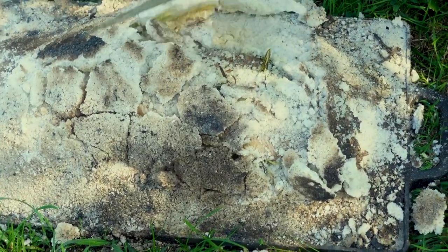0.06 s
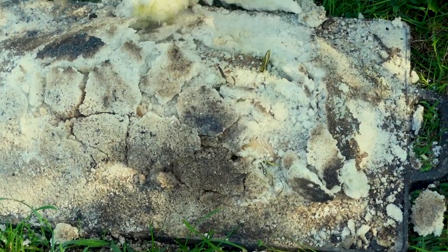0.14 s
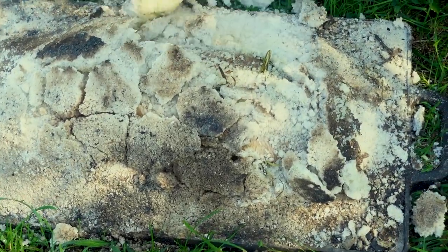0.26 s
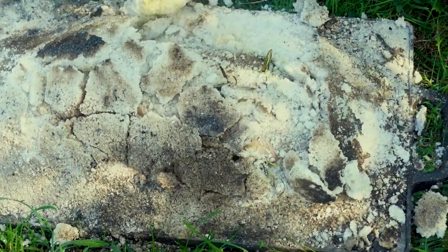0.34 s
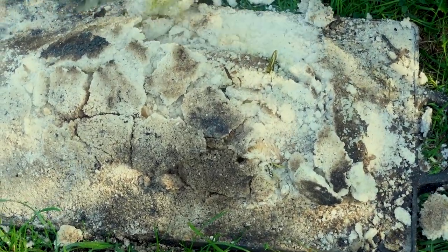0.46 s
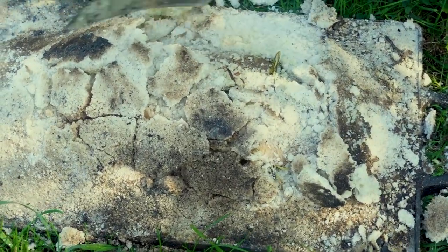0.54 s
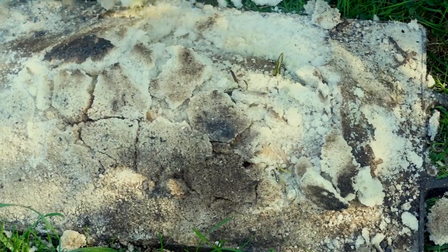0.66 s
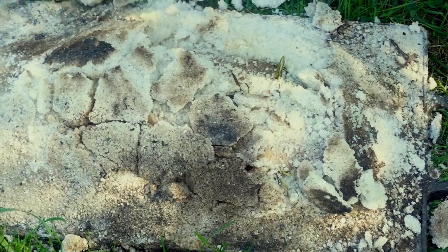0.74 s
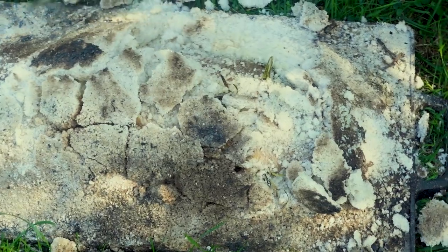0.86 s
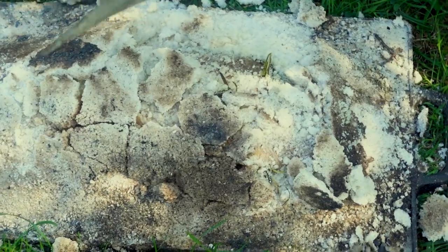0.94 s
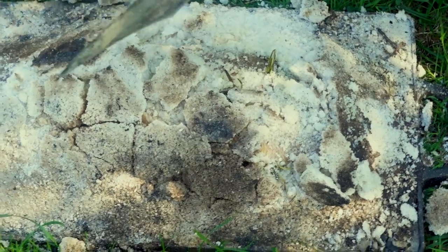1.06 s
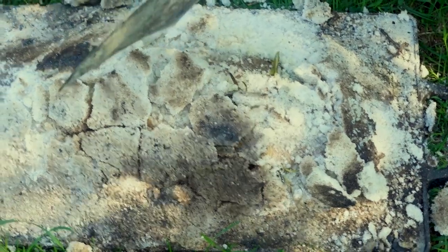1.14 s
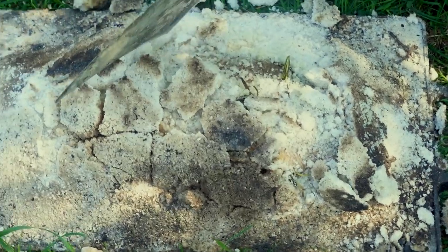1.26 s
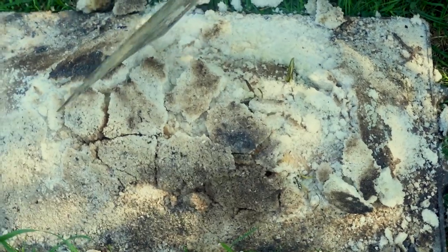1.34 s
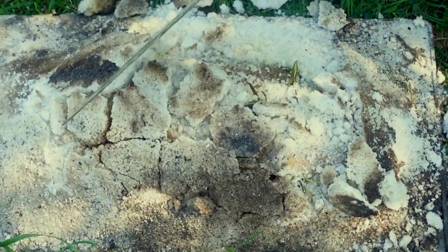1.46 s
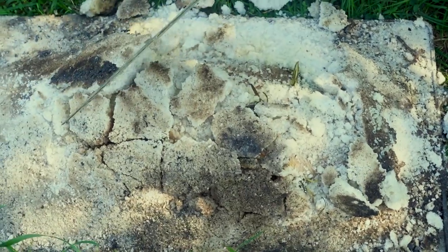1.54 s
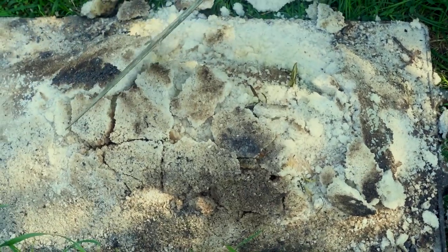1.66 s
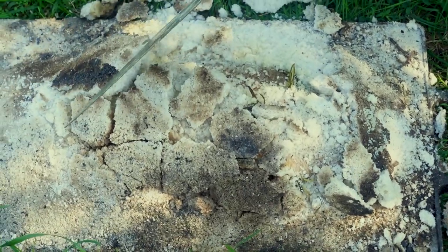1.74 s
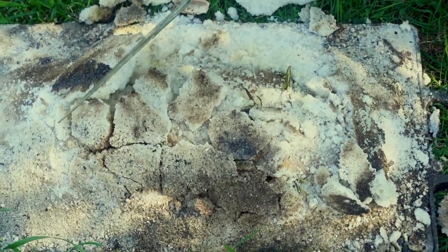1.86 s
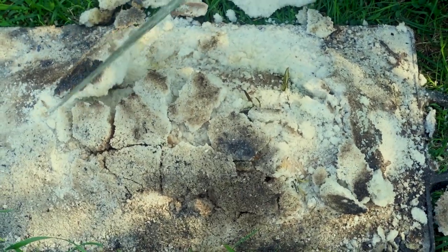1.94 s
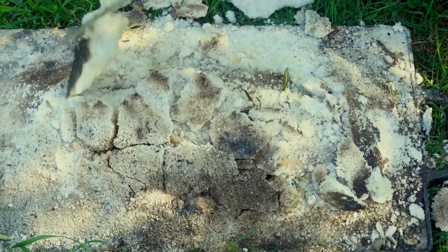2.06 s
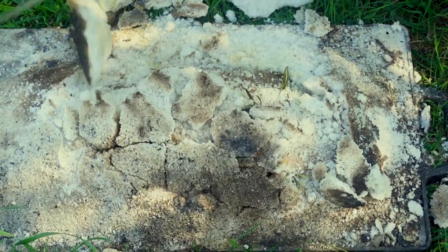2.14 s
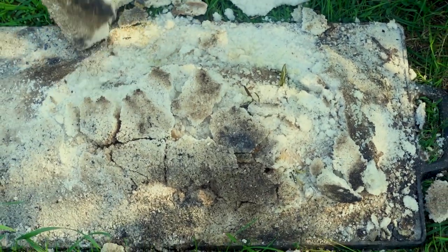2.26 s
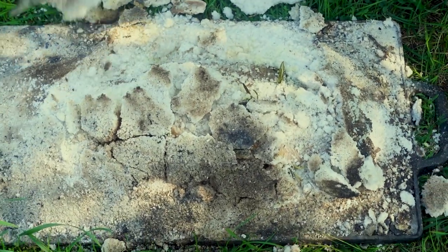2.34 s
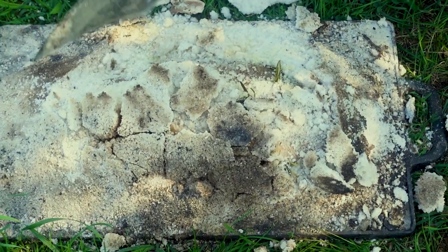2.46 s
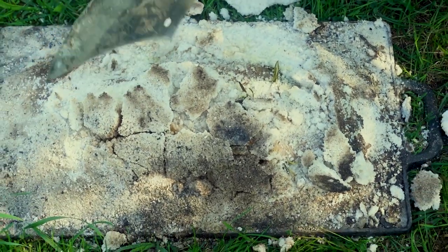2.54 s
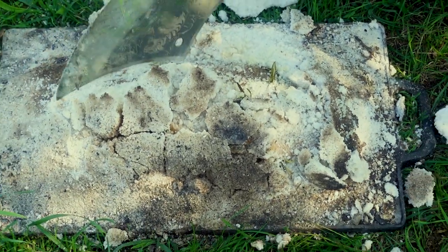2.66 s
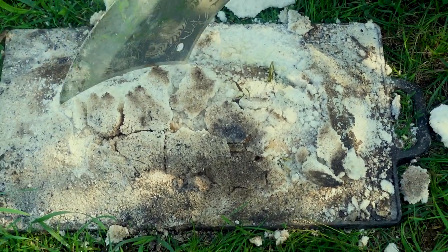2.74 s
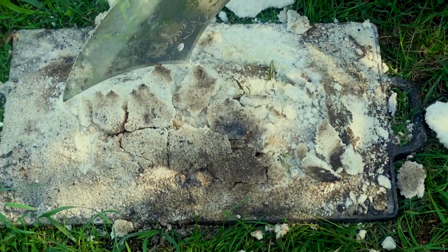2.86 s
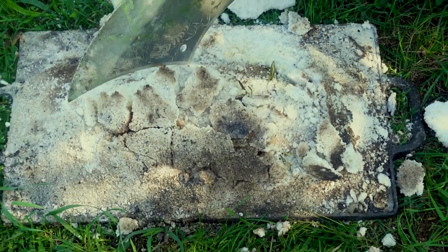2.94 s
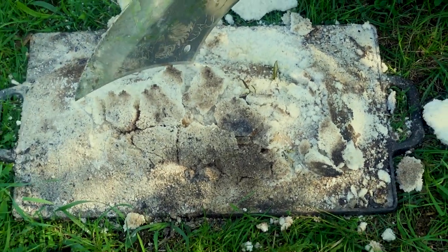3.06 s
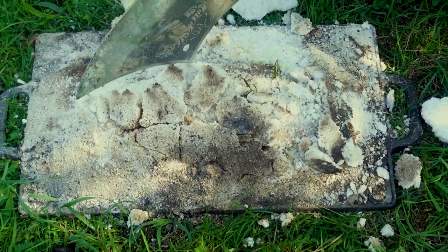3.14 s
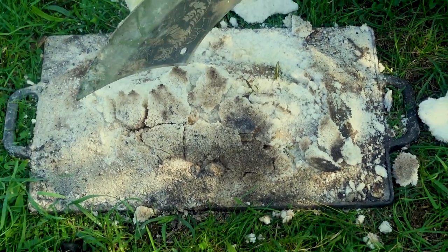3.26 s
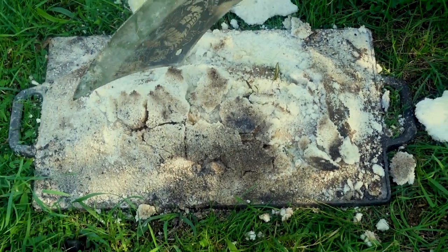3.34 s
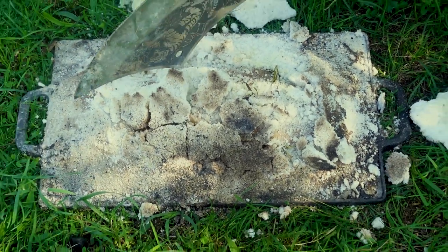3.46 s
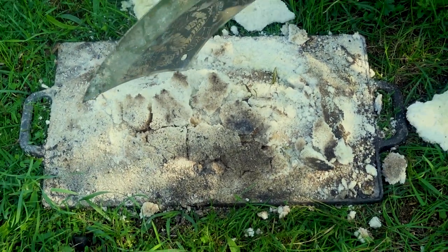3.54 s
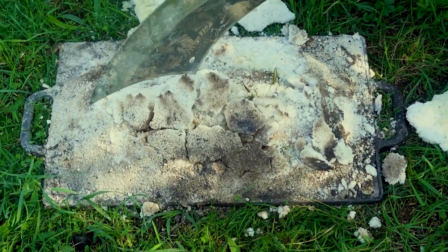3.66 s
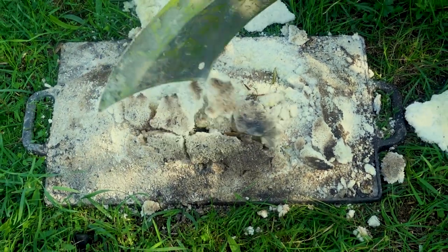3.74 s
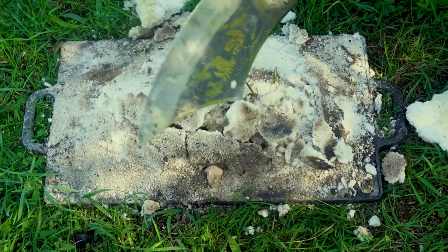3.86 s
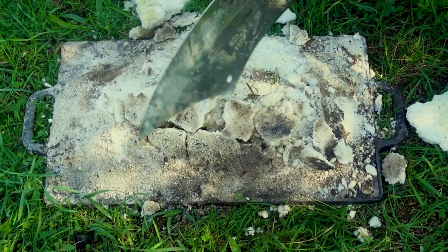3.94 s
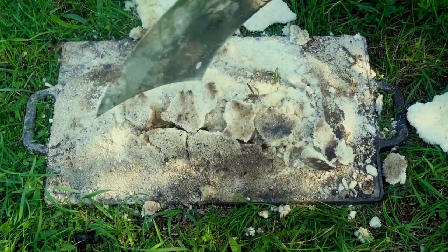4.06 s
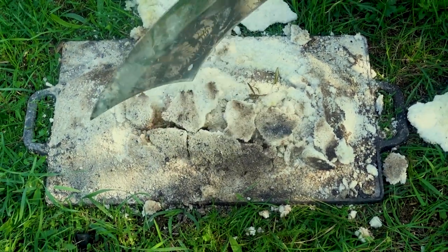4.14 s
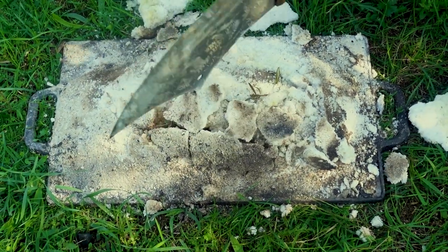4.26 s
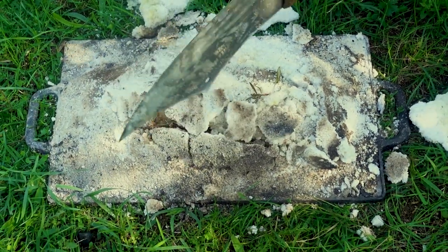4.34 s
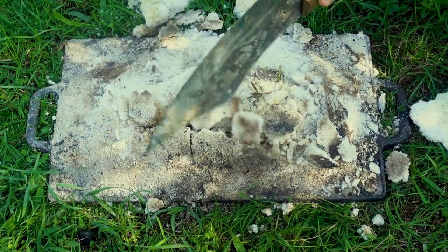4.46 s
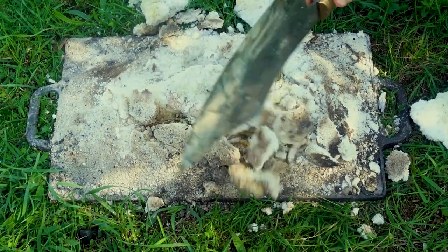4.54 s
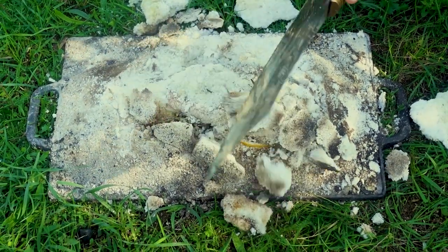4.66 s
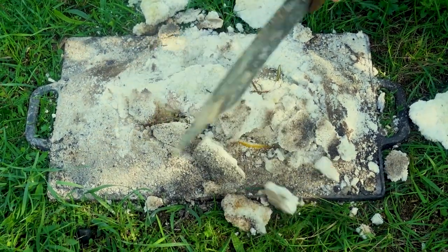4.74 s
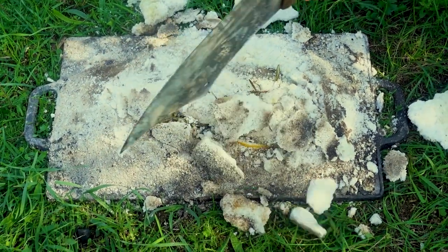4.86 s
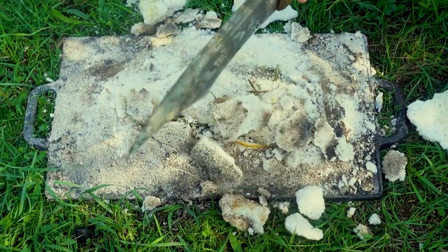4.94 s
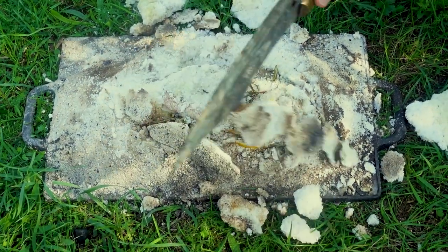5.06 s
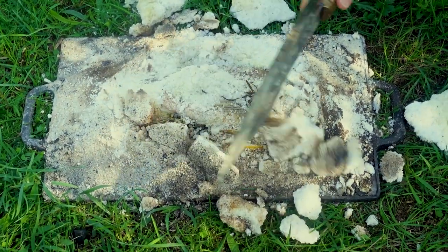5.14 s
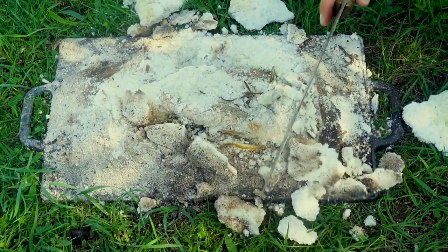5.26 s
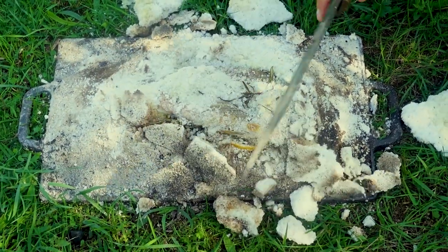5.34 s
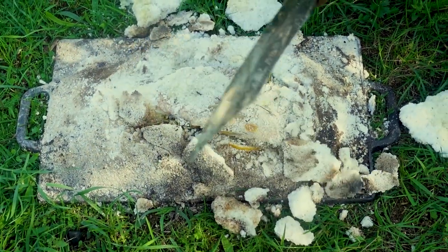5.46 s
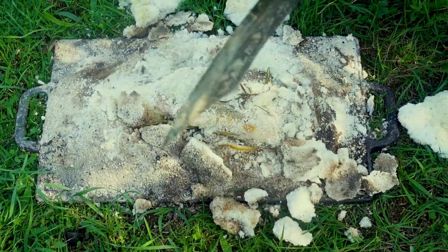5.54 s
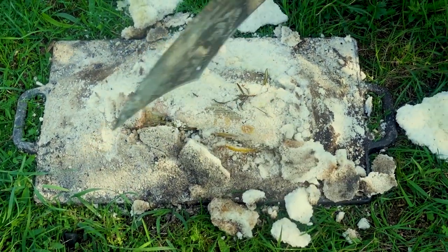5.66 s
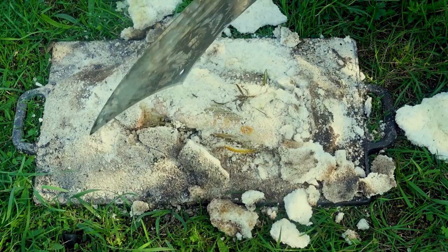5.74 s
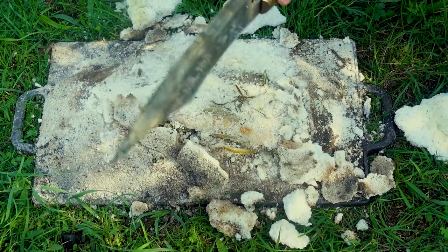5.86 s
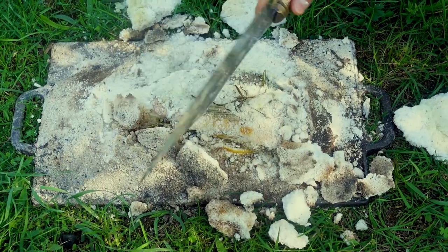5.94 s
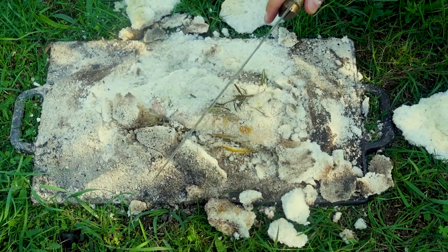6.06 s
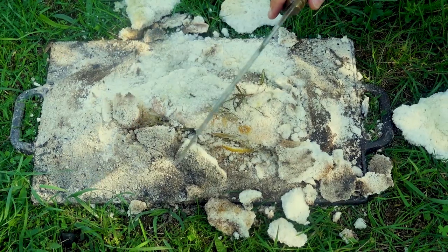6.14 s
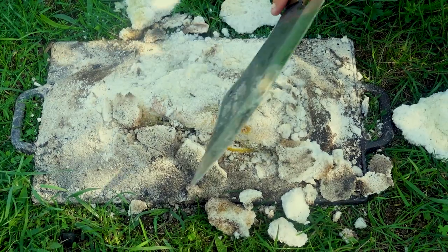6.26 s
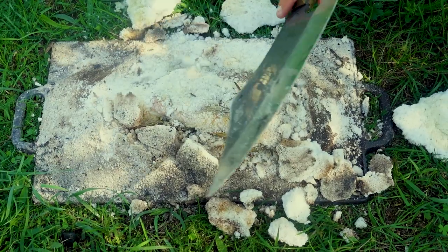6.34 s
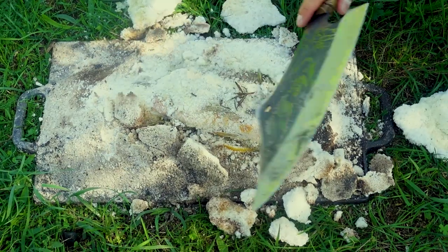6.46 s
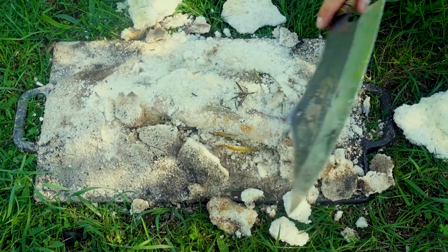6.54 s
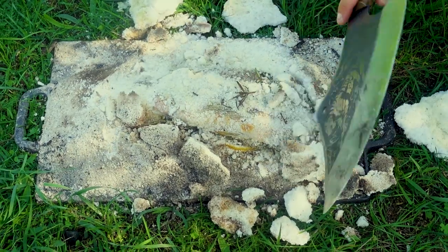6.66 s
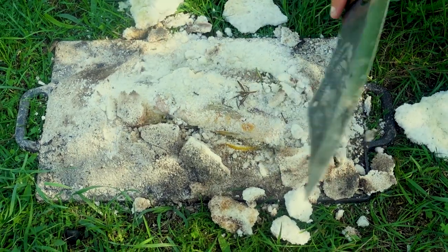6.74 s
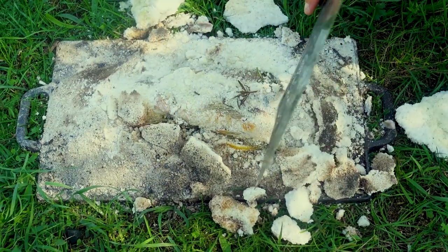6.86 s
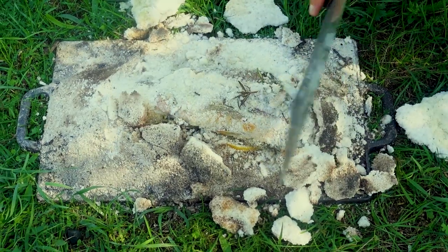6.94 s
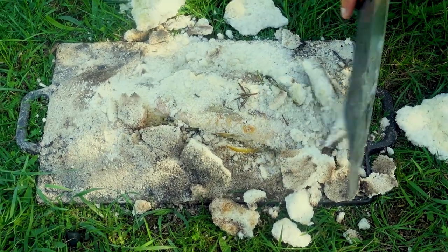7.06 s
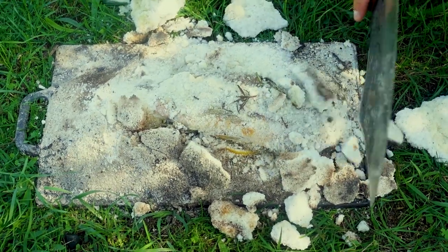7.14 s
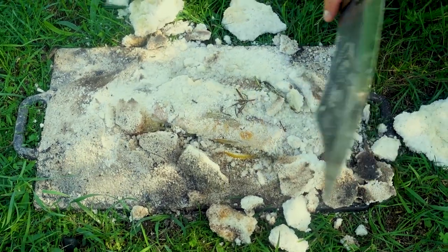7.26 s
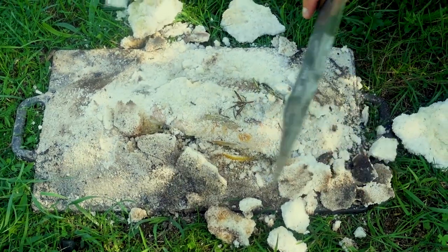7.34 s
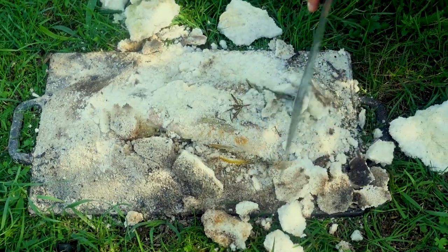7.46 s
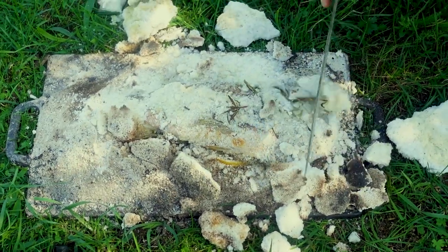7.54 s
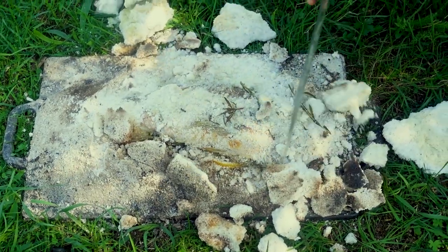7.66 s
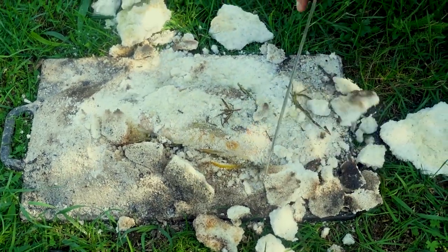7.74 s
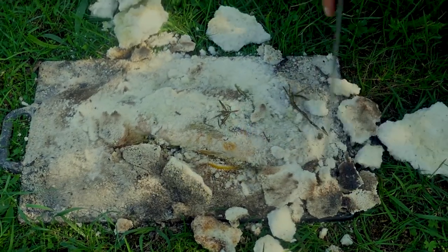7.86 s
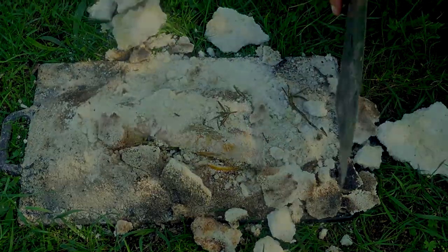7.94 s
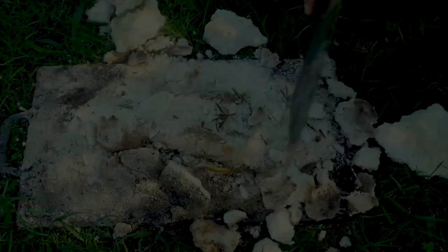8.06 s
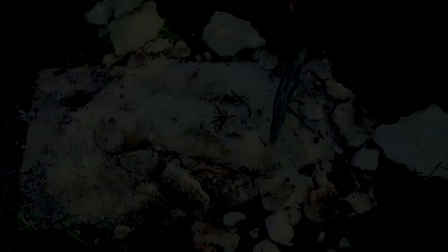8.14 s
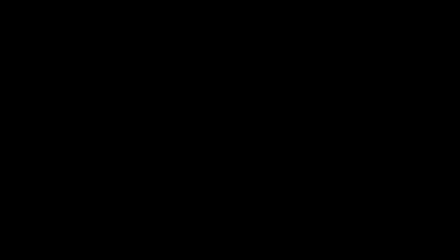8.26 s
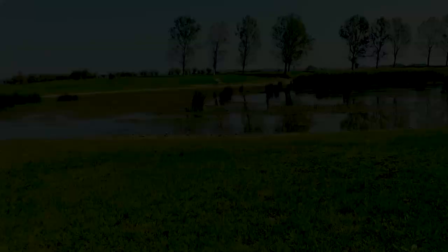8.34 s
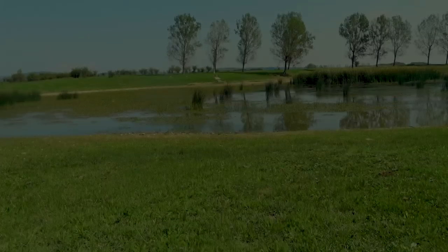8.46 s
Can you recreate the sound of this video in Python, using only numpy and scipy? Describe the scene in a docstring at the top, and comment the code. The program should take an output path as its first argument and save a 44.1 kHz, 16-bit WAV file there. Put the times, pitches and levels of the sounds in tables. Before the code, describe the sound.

Gritty rasps, sharp snaps and short steel rings as a blade breaks baked salt, with crumbs pattering and lumps knocking on a tray outdoors.

```python
"""Knife through a salt crust

Outdoors, microphones close to an iron tray lying in grass; a big knife works just right of centre.
The blade rasps over loose salt, bites into the baked crust and rings briefly. Plates of crust snap,
crumbs patter and lumps knock on the tray, with a short wash of echoes off the ground.
A steady fine hiss lies behind it all, then everything stops dead and leaves a faint low rumble."""
import sys
import numpy as np
from scipy import signal
from scipy.fft import rfft, irfft, next_fast_len
from scipy.io import wavfile
from scipy.ndimage import uniform_filter1d, map_coordinates

SR = 44100
rng = np.random.default_rng(int(sys.argv[2]) if len(sys.argv) > 2 else 0)


def output_pcm(signal):
    """Save a mono or channel-first signal as 16-bit PCM at the path in sys.argv[1].

    Samples are clipped to [-1, 1] before scaling.
    """
    pcm = np.clip(np.atleast_2d(signal).T, -1, 1) * 32767
    wavfile.write(sys.argv[1], SR, np.round(pcm).astype(np.int16))


N = 374398
TIME = np.arange(N) / SR
CUTOFF_HZ, HISS_ENDS_S = 15900, 8.277
HISS_DB, RUMBLE_DB = -53.5, -61

# strokes through loose salt: peak_s, swell_s, fade_s, level_db, fineness_db (added per finer grain size)
SALT_STROKES = [(0.10, 0.1, 0.66, -52.5, -4.5), (0.77, 0.017, 0.29, -49, -3), (1.39, 0.4, 0.26, -55.5, -8),
                (2.46, 0.49, .1, -55, 3), (2.57, 0.12, 0.082, -54.5, 10), (3.27, 0.13, 0.079, -60, 1),
                (3.92, 0.14, 0.46, -60, -10.5), (4.32, 0.26, 0.11, -50, 4.5), (4.58, 0.046, 0.43, -53, -6),
                (4.69, 0.23, 0.16, -58.5, 11.5), (5.13, 0.057, 0.17, -47, -2.5),
                (5.25, 0.26, 0.7, -65, 11.5), (6.14, 0.16, 0.12, -51.5, -0.5),
                (6.55, 0.018, 0.13, -45.5, -1), (6.72, 0.023, 0.27, -48, 2), (7.80, 0.72, 0.42, -57.5, -3)]
# bands of crumbs, grit and powder: low_hz, high_hz
GRAIN_BANDS = [(1000, 3400), (3400, 7800), (7800, 16000)]
# each grain size's share of a stroke: crumbs_db, grit_db, powder_db
STROKE_SHARES = (-0.9, 2.5, -2.5)
# bright hiss of salt that lasts between the strokes: time_s, level_db
SALT_HISS = [(0, -49.5), (2.55, -60), (2.75, -62), (3.75, -59.5), (4.1, -54), (6.3, -53.5), (8.24, -55)]
# each grain size's share of that hiss: crumbs_db, grit_db, powder_db
SALT_HISS_SHARES = (-5, -0.77, -3)
# colour of the rasp: frequency_hz, gain_db
RASP_SPECTRUM = [(300, 7), (600, 6.5), (950, 0), (1250, 0.5), (1700, 2.5), (2000, 2.5), (2600, 2.5),
                 (3400, 2.5), (4500, 4), (7000, -0.5), (10000, -6), (13000, -12), (16000, -23)]
# sweeps of the blade through fine salt: start_s, end_s, first_hz, last_hz, level_db
BLADE_SWEEPS = [(0.03, 0.36, 4500, 9000, -48.5), (0.25, 0.68, 10000, 14500, -53),
                (0.62, 0.84, 14000, 5000, -55), (2.16, 2.58, 4200, 9500, -51.5),
                (2.38, 2.62, 10500, 14500, -54)]
# resonances of the blade deep in the salt: pitch_hz, first_line_db, second_line_db, t60_s
BURIED_MODES = [(1266, -24, -23, 0.027), (1687, -20.5, -20, 0.041), (2450, -37, -12, 0.0066),
                (2860, -42, -19, .018), (3670, -38, -19, .025), (4460, -31, -29, 0.02),
                (5330, -27, -38, .012), (6200, -35, -23, .012), (7250, -32, -21, .02),
                (7900, -27, -36, 0.022)]
# bites into the crust: peak_s, swell_s, fade_s, grit_db, tilt_db_per_octave, ring_db
CRUST_BITES = [ (0.653, 0.002, 0.0064, -34, 4, -49), (0.764, .003, 0.025, -52, -1, -51),
               (1.385, 0.0072, .006, -44, -4, -60), (1.522, .0015, 0.015, -43, -4, -66),
               (3.557, 0.002, 0.0045, -45, -3, -52), (3.804, 0.0045, 0.0088, -47, 0, -50),
               (3.853, 0.016, 0.0091, -41.5, 2, -55), (3.875, 0.023, 0.027, -42, -5, -52),
               (4.428, 0.032, 0.064, -44.5, 0.5, -53), (4.438, 0.00048, 0.012, -46, 3, -48),
               (4.551, 0.029, 0.036, -39.5, -1.5, -45), (4.596, 0.0074, 0.01, -43, -8, -58),
               (4.629, 0.0006, 0.02, -35.5, -1.5, -57), (5.072, .005, 0.012, -35.5, -2, -45),
               (5.089, .005, .006, -38, 0.5, -52), (5.147, 0.0073, 0.005, -41, -5, -42),
               (5.163, 0.0056, 0.0082, -32, -2, -47), (5.984, 0.0025, 0.0036, -29, 0.5, -35),
               (5.990, 0.0047, 0.016, -28.5, 7, -37), (6.064, 0.00038, 0.0054, -25, 7, -49),
               (6.080, 0.012, 0.0077, -26, 5, -44), (6.174, .0004, .005, -37, 1.5, -48),
               (6.209, 0.014, 0.01, -46, 2.5, -41), (6.480, 0.0028, 0.068, -41.5, 0.5, -55),
               (6.519, 0.021, 0.043, -38.5, 0.5, -44), (6.553, .004, .008, -41, -3.5, -44),
               (6.591, 0.0084, 0.0079, -36, 3, -37), (6.628, 0.0075, 0.011, -32.5, 1.5, -35),
               (6.644, 0.0046, 0.011, -36.5, -1, -38), (6.669, 0.0019, 0.0046, -29.5, 2, -45),
               (7.043, 0.00084, 0.0086, -49, -2, -42), (7.061, 0.021, 0.007, -39.5, -2, -34),
               (7.085, 0.001, 0.0041, -45, -0.5, -34), (7.108, 0.0037, 0.021, -50, -1.5, -35),
               (7.437, 0.0008, 0.013, -37, -2, -54), (7.526, 0.011, 0.016, -46, -3.5, -46.5)]
# colour of crushing crust: frequency_hz, gain_db
CRUSH_SPECTRUM = [(40, -58), (130, -17), (300, -25.5), (700, -18.5), (1300, 5), (3000, 6), (6500, 2),
                  (9500, -4), (12500, -20), (16000, -27)]
# modes of the blade: pitch_hz, from_belly_db, from_tip_db, t60_s
BLADE_MODES = [(1340, -21, -29, .12), (1530, -21, -35, .05), (1852, -18, -32, .05), (2036, -17, -35, .12),
               (2410, -16, -33, .04), (2647, -10.5, -28, .05), (2762, -18, -35, .25), (3142, -24, -34, .1),
               (3406, -14, -30, .045), (3560, -24, -30, .3), (3886, -6.5, -19, .045),
               (4427, -8.8, -6.5, .1), (4900, -22, -30, .03), (5168, -20, -34, .1), (6225, -11, -18, .05),
               (6300, -9.5, -7.5, .052), (6886, -7, -30, .045), (7290, -23, -32, .1), (8137, -19, -30, .12),
               (8258, -24, -19, .25), (8648, -16, -18, .15), (9090, -24, -32, .08), (9550, -21, -30, .04),
               (10320, -21, -17, .07), (10750, -25, -30, .04)]
# steel striking hard crust or iron: time_s, level_db, place_along_blade_m
BLADE_CLINKS = [(4.417, -9, .08), (4.437, 0.5, .1285), (4.446, -8, .08), (6.0655, -5, 0.126),
                (6.083, -18, 0.032), (6.513, -9, 0.12), (6.552, -10, .0545), (6.589, 2.5, 0.04),
                (6.626, -12, .137), (6.641, -8, 0.059), (6.665, 0.5, 0.19), (7.041, -1, 0.023),
                (7.109, -4.5, 0.37), (7.437, -10.5, 0.038)]
# modes of the blade clear of the crust: pitch_hz, level_db, t60_s
FREE_MODES = [(1335, -43, .17), (3548, -53, 1.5), (4432, -49, 1.2), (6305, -47, .17)]
# the blade springs free: time_s, level_db
BLADE_LIFTS = [(6.087, 0), (7.525, -10)]
# plates of crust snap: time_s, peak_db, pitch_hz, t60_s
CRUST_SNAPS = [(1.3392, -8.5, 2960, 0.0087), (1.3393, -33, 5030, .008), (1.4288, -27, 2700, .003),
               (1.4328, -23.5, 2500, .007), (1.5195, -21, 3170, .009), (1.5200, -27, 4570, .008),
               (1.5283, -26, 3900, 0.008), (1.5345, -23.5, 3400, 0.007), (1.5392, -28, 4170, .003),
               (1.5618, -25.5, 1880, 0.0032), (3.994, -22.5, 1380, 0.014), (3.9950, -26, 2280, .009),
               (3.9945, -30, 2900, .007), (4.2725, -23, 7500, .0015), (4.3135, -27, 7000, .0015),
               (4.3575, -24.5, 7000, .0015), (4.5490, -20.5, 4440, .003), (4.7153, -21.5, 1300, 0.014),
               (4.7540, -26, 1980, 0.0028), (4.7880, -30, 2900, .006), (5.0895, -26, 5650, 0.0028),
               (5.1634, -20, 2500, 0.005), (5.2110, -24, 4570, 0.0014), (5.342, -23.5, 1410, 0.02),
               (5.3422, -22.5, 2600, 0.0086), (5.9828, -17, 6500, .0033), (5.9954, -7.5, 7100, 0.0019),
               (6.0073, -15, 7250, .004), (6.0115, -14, 6800, .002), (6.0147, -13, 6560, .0015),
               (6.0535, -15, 6000, 0.0028), (6.064, -16, 3920, 0.0042), (6.079, -15.5, 6630, 0.0018),
               (7.2160, -26, 2700, 0.006), (7.2170, -29, 6200, .008), (7.2177, -27, 1460, 0.02),
               (7.6480, -21.5, 6440, .004), (7.8003, -31.5, 1500, 0.0062)]
# partials of a piece of crust: pitch_ratio, level_db
CRUST_PARTIALS = [(.56, -34.5), (1, 7), (1.179, 0.5), (1.62, 3.5), (2.25, -32), (3.2, -2)]
# lumps land on the tray: time_s, peak_db, pitch_hz
LUMP_KNOCKS = [(1.146, -40, 426), (1.261, -45, 179), (1.287, -47, 440), (1.326, -39, 170),
               (1.366, -41.5, 350), (1.431, -37.5, 444), (1.560, -41, 537), (1.568, -38.5, 447),
               (3.866, -44, 710), (3.880, -48, 560), (4.642, -53, 210), (4.676, -54, 220),
               (4.715, -33.5, 740), (4.755, -44, 600), (4.788, -38, 775), (5.164, -49, 170),
               (5.343, -43.5, 587), (6.587, -48, 328), (6.667, -46, 350), (7.056, -42, 205),
               (7.065, -38, 500), (7.215, -31.5, 485), (7.22, -43, 200), (7.524, -57, 646),
               (7.552, -45, 520), (7.705, -45, 574), (7.766, -34.5, 710), (7.801, -44, 754),
               (7.848, -40, 518), (7.881, -35, 500)]
# modes of the tray, damped by the grass: pitch_hz, level_db, t60_s
TRAY_MODES = [(170, -38, 0.074), (230, -31, 0.1), (507, -34.5, 0.025), (638, -27.5, 0.024)]
# loosened crumbs patter down: start_s, length_s, level_db
CRUMB_SHOWERS = [(4.53, 0.39, -54.5), (5.08, 0.3, -51), (7.44, 0.34, -61)]
# the finest crystals burst under the sliding blade: start_s, length_s, level_db
CRYSTAL_SPARKLES = [(4.08, .34, -58), (4.5, .35, -58.5), (5.05, .55, -58.5), (6.70, 0.21, -63)]
# resonances of the gap under the sliding blade: pitch_hz, level_db, t60_s
GAP_MODES = [(1770, -22.5, 0.022), (3040, -41, 0.013), (4260, -30, 0.0015), (12050, -32, 0.0052)]
# echo off the flat of the blade, drawing closer: time_s, delay_s, echo_gain (negative when inverted)
BLADE_ECHO = [(0, .00071, .15), (1.35, .00066, .15), (1.6, .000655, .6), (2.08, .000655, .55),
              (2.2, .00065, 0), (2.55, .000545, 0), (2.7, .000545, -.38), (3.1, .000535, -.4),
              (3.3, .00056, -.2), (3.5, .000546, -.38), (3.9, .00053, -.2), (4.1, .00042, .07)]
# the knife's place before the microphones: time_s, pan_db (added on the right, taken off the left)
KNIFE_POSITION = [(0, .1), (5.0, .4), (6.0, .6), (6.6, 1.25), (7.2, 1.2), (7.6, 0)]
# ground echoes arriving from the sides: frequency_hz, gain_db
GROUND_ECHO_SPECTRUM = [(60, -14), (140, -10.5), (280, -10.5), (550, -7), (1100, -7.5), (2200, -12),
                        (7000, -13), (13000, -11)]
# colour of the background hiss: frequency_hz, gain_db
HISS_SPECTRUM = [(18, -65), (30, -41), (51, -21), (93, -11.5), (233, -10.5), (300, -12.5), (780, -13),
                 (1040, -14), (1350, -9), (1590, -13), (1960, -6), (3060, -3.5), (6720, -16.5),
                 (12300, -18.5), (16000, -28.5)]
# colour of the closing rumble: frequency_hz, gain_db
RUMBLE_SPECTRUM = [(30, -29.5), (60, -18.5), (150, -9.5), (280, 1.5), (400, -14.5), (800, -19), (2500, -25),
                   (5500, -29.5), (8000, -36.5), (16000, -38)]
# likeness of the background at the two microphones: frequency_hz, correlation (-1 to 1)
STEREO_LIKENESS = [(40, .97), (120, 0.84), (400, 0.07), (1000, 0.1), (2500, 0.87), (8000, 0.84),
                   (14000, 0.74)]


def scrape(judder_db, judder_hz):
    """Three sizes of grain rasp under each stroke of the blade, which judders as it catches and slips."""
    slips = np.interp(TIME * judder_hz, np.arange(2000), rng.standard_normal(2000))
    t = TIME[::64]
    hiss_db = np.interp(t, *np.transpose(SALT_HISS))
    out = np.zeros(N)
    sizes = zip(GRAIN_BANDS, (-1, 0, 1), STROKE_SHARES, SALT_HISS_SHARES)
    for band, size_step, share_db, hiss_share_db in sizes:
        power = from_db(hiss_db + hiss_share_db) ** 2
        for peak_s, swell_s, fade_s, level_db, fineness_db in SALT_STROKES:
            gain = from_db(level_db + share_db + size_step * fineness_db)
            power += (gain * swell_and_fade(t - peak_s, swell_s, fade_s)) ** 2
        rasp = coloured(grains(N, per_s=9000, spread_db=3.5), RASP_SPECTRUM)
        out += rms_one(band_limited(rasp, *band)) * np.interp(TIME, t, np.sqrt(power))
    return out * from_db(judder_db * slips)


def swishes(width_octaves):
    """A broad resonance glides as the contact runs along the blade."""
    hz, frame_s, frames = signal.stft(grains(N, per_s=9000, spread_db=3), SR, nperseg=256)
    gain = np.zeros(frames.shape)
    for start_s, end_s, first_hz, last_hz, level_db in BLADE_SWEEPS:
        along = np.clip((frame_s - start_s) / (end_s - start_s), 0, 1)
        centre_hz = first_hz + (last_hz - first_hz) * along
        hump = np.exp(-.5 * (np.log2((hz[:, None] + 1) / centre_hz) / width_octaves) ** 2)
        gain += from_db(level_db) * np.sin(np.pi * along) * hump / np.sqrt(np.mean(hump ** 2, axis=0))
    return signal.istft(frames * gain, SR, nperseg=256)[1][:N]


def buried_blade(rasp, new_line_s, drawn_out_s, release_s):
    """Deep in the salt, the damped blade adds broad resonances, weighted anew on each line it takes."""
    depth = np.clip((drawn_out_s - TIME) / release_s, 0, 1)
    return sum(ring(rasp * depth * from_db(np.where(TIME < new_line_s, first_db, second_db)), hz, t60)
               for hz, first_db, second_db, t60 in BURIED_MODES)


def cracking_crystals(rasp, relative_db):
    """Now and then a larger crystal cracks, the louder the harder the blade scrapes."""
    effort = np.sqrt(np.abs(uniform_filter1d(rasp ** 2, size=SR // 30)))
    ticks = rms_one(coloured(grains(N, per_s=41, spread_db=3.5), CRUSH_SPECTRUM))
    return from_db(relative_db) * effort * ticks


def bites(tip_share_db, tip_strike_s, tip_strike_db):
    """Each bite is an avalanche of grains: gives its crunch and its force on the blade's belly and tip."""
    crunch, belly, tip = np.zeros((3, N))
    t = np.arange(-SR // 8, SR // 4) / SR
    for peak_s, swell_s, fade_s, grit_db, tilt_db, ring_db in CRUST_BITES:
        envelope = swell_and_fade(t, swell_s, fade_s)
        tilt = [(hz, tilt_db * np.log2(hz / 4000)) for hz in (1000, 12000)]
        force = coloured(grains(len(t), per_s=7000, spread_db=4.0), tilt)
        grit = rms_one(coloured(force, CRUSH_SPECTRUM))
        add(crunch, peak_s + t[0], from_db(grit_db) * envelope * grit)
        add(belly, peak_s + t[0], from_db(ring_db) * envelope * force)
        whole_blow = np.sqrt(np.sum(envelope ** 2))   # the tip takes it all at once
        add(tip, peak_s, [from_db(ring_db + tip_share_db) * whole_blow])
    add(tip, tip_strike_s, [from_db(tip_strike_db)])   # one direct hit on the very tip
    return band_limited(crunch, low_hz=91, high_hz=CUTOFF_HZ), belly, tip


def blade_ring(belly, tip):
    """The steel rings briefly, damped by the salt; the point of contact picks the modes."""
    return sum(ring(from_db(belly_db) * belly + from_db(tip_db) * tip, hz, t60)
               for hz, belly_db, tip_db, t60 in BLADE_MODES)


def clinks(attack_s, node_power_share):
    """A sharp contact rings the modes that bend where it lands and mostly spares those with a node there."""
    out, t = np.zeros(N), np.arange(SR // 3) / SR
    blow = 1. * (t == 0)
    onset = 1 - np.exp(-t / attack_s)
    for hz, belly_db, _, t60 in BLADE_MODES:
        wavelength_m = .07 * np.sqrt(4000 / hz)   # bending waves: 7 cm at 4 kHz
        mode = from_db(belly_db) * onset * ring(blow, hz, t60)
        for time_s, level_db, place_m in BLADE_CLINKS:
            bend = np.sqrt(node_power_share + np.sin(2 * np.pi * place_m / wavelength_m) ** 2)
            add(out, time_s, from_db(level_db) * bend * mode)
    return out


def free_ring():
    """Lifted clear of the salt, the undamped steel sings on faintly."""
    out, t = np.zeros(N), np.arange(SR) / SR
    song = sum(from_db(db - 60 * t / t60) * np.sin(2 * np.pi * hz * t) for hz, db, t60 in FREE_MODES)
    for time_s, level_db in BLADE_LIFTS:
        add(out, time_s, from_db(level_db) * song)
    return out


def crust_pieces(strikes, scatter, crumble_db):
    """A struck piece of crust rings for a few cycles, overtones dying first, and sheds crumbs."""
    out, t = np.zeros(N), np.arange(SR // 10) / SR
    for time_s, peak_db, pitch_hz, t60 in strikes:
        sound = np.zeros(len(t))
        for ratio, level_db in CRUST_PARTIALS:
            hz = pitch_hz * ratio ** (1 + scatter * rng.standard_normal())
            decay = from_db(level_db - 60 * t / t60 * np.sqrt(ratio))
            sound += (hz < CUTOFF_HZ) * rng.choice([-1, 1]) * decay * np.sin(2 * np.pi * hz * t)
        crumbs = band_limited(rng.standard_normal(len(t)), pitch_hz / 2, 2 * pitch_hz)
        sound += rms_one(crumbs) * from_db(crumble_db - 40 * t / t60)
        add(out, time_s, from_db(peak_db) * sound / np.abs(sound).max())
    return out


def lump_knocks(t60):
    """Lumps of crust drop on the tray, each with a dull knock."""
    strikes = [(time_s, peak_db, pitch_hz, t60) for time_s, peak_db, pitch_hz in LUMP_KNOCKS]
    return band_limited(crust_pieces(strikes, scatter=0.1, crumble_db=-4), low_hz=109, high_hz=2500)


def tray(belly, crunch, rasp, reaches_iron_s):
    """Crushing shakes the tray underneath; so does scraping, once the blade is down on the iron."""
    push = belly + from_db(16.0) * crunch + from_db(8.5) * rasp * (TIME > reaches_iron_s)
    return sum(from_db(level_db) * ring(push, hz, t60) for hz, level_db, t60 in TRAY_MODES)


def debris(relative_db, fade_s):
    """Each lump crumbles a little as it lands."""
    out, t = np.zeros(N), np.arange(SR // 10) / SR
    for time_s, peak_db, pitch_hz in LUMP_KNOCKS:
        bits = rms_one(band_limited(grains(len(t), per_s=770, spread_db=3.5), pitch_hz, 4600))
        add(out, time_s, from_db(peak_db + relative_db) * bits * np.exp(-t / fade_s))
    return out


def showers(per_s):
    """Separate crumbs land, each ticking for a few cycles at one of nine pitches."""
    pitches_hz = np.geomspace(1400, 4800, 9)
    patter = np.zeros(N)
    for hz in pitches_hz:
        landings = grains(N, per_s / len(pitches_hz), spread_db=2.0)
        patter += rms_one(ring(landings, hz, t60=6 / hz))
    return arches(CRUMB_SHOWERS) * rms_one(patter)


def sparkle(per_s):
    """Tiny crystals burst one by one, each a dry tick in the top of the treble."""
    ticks = band_limited(grains(N, per_s, spread_db=5), low_hz=7500, high_hz=14400)
    return arches(CRYSTAL_SPARKLES) * rms_one(ticks)


def hollow_gap(hiss, start_s, end_s, ramp_s):
    """The gap between the sliding blade and the crust gives the hiss a hollow voice."""
    sliding = np.clip(np.minimum(TIME - start_s, end_s - TIME) / ramp_s + .5, 0, 1)
    return hiss + sum(from_db(db) * ring(hiss * sliding, hz, t60) for hz, db, t60 in GAP_MODES)


def blade_reflection(hiss):
    """A very short treble echo off the narrow steel colours the hiss, shifting as the knife moves."""
    time_s, delay_s, echo_gain = np.transpose(BLADE_ECHO)
    delayed_index = np.arange(N) - SR * np.interp(TIME, time_s, delay_s)
    treble = coloured(hiss, [(2500, -15), (4500, -11), (7000, -3)])
    echo = np.array([map_coordinates(channel, [delayed_index], order=3) for channel in treble])
    return hiss + np.interp(TIME, time_s, echo_gain) * echo


def ground_echoes(x, t60):
    """The ground scatters a short wash of echoes, which reaches the microphones from the sides."""
    t = np.arange(SR // 16) / SR
    echoes = rng.standard_normal(len(t)) * from_db(-60 * t / t60) * (t > .001)
    echoes /= np.sqrt(np.sum(echoes ** 2))
    side = coloured(signal.fftconvolve(x, echoes)[:N], GROUND_ECHO_SPECTRUM)
    return x + side * np.array([[1], [-1]])


def background(spectrum):
    """A wide bed of finely grained noise across both microphones; rms 1."""
    size = next_fast_len(N)
    alike = np.clip(at_bins(STEREO_LIKENESS, size), -1, 1)
    mid = rfft(grains(size, per_s=16000, spread_db=3.0))
    side = rfft(rng.standard_normal(size))
    pair = np.sqrt(1 + alike) * mid + np.sqrt(1 - alike) * side * [[1], [-1]]
    return rms_one(irfft(pair * from_db(at_bins(spectrum, size)), size)[:, :N])


def grains(size, per_s, spread_db):
    """Clicks at random moments, as of breaking crystals: most small, a few large; rms 1."""
    breaks = rng.random(size) < per_s / SR
    strength = from_db(spread_db * np.minimum(rng.exponential(1, size), 4))
    return rms_one(breaks * strength * rng.choice([-1, 1], size))


def ring(drive, hz, t60):
    """One mode, dying by 60 dB in t60 seconds; white noise keeps its power through it."""
    radius, angle = from_db(-60 / (t60 * SR)), 2 * np.pi * hz / SR
    feedback = [1, -2 * radius * np.cos(angle), radius * radius]
    return signal.lfilter(np.sqrt(1 - radius) * np.array([1, 0, -1]), feedback, drive + 1e-18)


def swell_and_fade(t, swell_s, fade_s):
    """Envelope of a push of the knife, 1 at t = 0."""
    return np.exp(-np.minimum(np.abs(t) / np.where(t < 0, swell_s, fade_s), 20))


def arches(spells):
    """A level that rises and falls in an arch over each spell."""
    return sum(from_db(level_db) * np.sqrt(np.clip(1 - (2 * (TIME - start_s) / length_s - 1) ** 2, 0, 1))
               for start_s, length_s, level_db in spells)


def band_limited(x, low_hz, high_hz):
    """Keep one band, its top no higher than the cutoff."""
    band_hz = [low_hz, min(high_hz, CUTOFF_HZ)]
    return signal.sosfilt(signal.butter(2, band_hz, "band", fs=SR, output="sos"), x)


def coloured(x, spectrum):
    """Equalise along a curve of frequency_hz, gain_db."""
    size = next_fast_len(x.shape[-1])
    return irfft(rfft(x, size) * from_db(at_bins(spectrum, size)), size)[..., :x.shape[-1]]


def at_bins(curve, size):
    """A curve of frequency_hz, value read at every bin of a transform."""
    hz, value = np.transpose(curve)
    return np.interp(np.log(np.fft.rfftfreq(size, 1 / SR) + 1), np.log(hz), value)


def add(track, start_s, sound):
    """Mix a short sound into a track."""
    at = max(0, int(start_s * SR))
    track[at:at + len(sound)] += sound[:N - at]


def from_db(db):
    """Decibels to gain."""
    return 10 ** (np.asarray(db) / 20)


def rms_one(x):
    """Scale to rms 1."""
    return x / np.sqrt(np.mean(x ** 2) + 1e-20)


def scene():
    """Knife and crust close up and a little to the right, the background wide behind them."""
    rasp = scrape(judder_db=1.0, judder_hz=89.7) + swishes(width_octaves=0.38)
    buried = buried_blade(rasp, new_line_s=0.68, drawn_out_s=1.33, release_s=0.31)
    rasp = rasp + buried + cracking_crystals(rasp, relative_db=-15)
    crunch, belly, tip = bites(tip_share_db=-29, tip_strike_s=0.651, tip_strike_db=-3.5)
    steel = blade_ring(from_db(1.0) * belly + from_db(-26) * rasp, from_db(1.5) * tip)
    steel += clinks(attack_s=0.00046, node_power_share=0.042) + free_ring()
    snaps = crust_pieces(CRUST_SNAPS, scatter=0.041, crumble_db=-9.0)
    thuds = lump_knocks(t60=0.039) + tray(belly, crunch, rasp, reaches_iron_s=4.2)
    salt = crunch + band_limited(snaps, low_hz=830, high_hz=11800)
    salt += debris(relative_db=-12, fade_s=0.012) + showers(per_s=70) + sparkle(per_s=190)
    pan = from_db(np.array([[-1], [1]]) * np.interp(TIME, *np.transpose(KNIFE_POSITION)))
    impacts = ground_echoes(salt, t60=0.03) + ground_echoes(steel, t60=0.031)
    impacts += ground_echoes(thuds, t60=0.1)
    hiss = ground_echoes(rasp, t60=0.076) * pan + from_db(HISS_DB) * background(HISS_SPECTRUM)
    hiss = blade_reflection(hollow_gap(hiss, start_s=1.55, end_s=3.75, ramp_s=0.23))
    rumble = from_db(RUMBLE_DB) * background(RUMBLE_SPECTRUM)
    return np.where(TIME < HISS_ENDS_S, impacts * pan + hiss, rumble)


def record(dry):
    """A steep low-pass on both microphones cuts the very top."""
    return signal.sosfilt(signal.ellip(10, .2, 80, CUTOFF_HZ, fs=SR, output="sos"), dry)


dry = scene()
out = record(dry)
output_pcm(out)
```